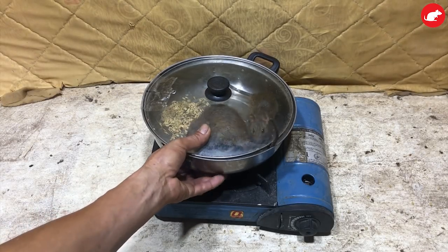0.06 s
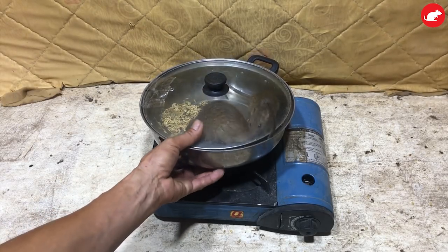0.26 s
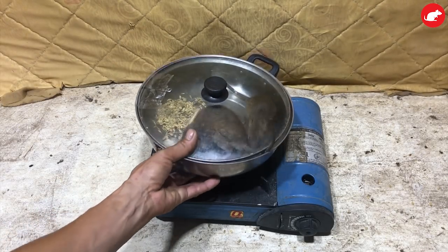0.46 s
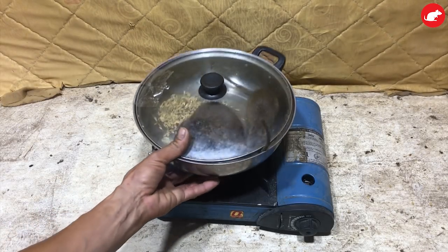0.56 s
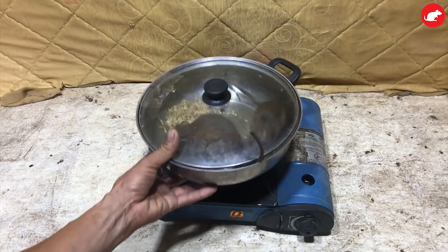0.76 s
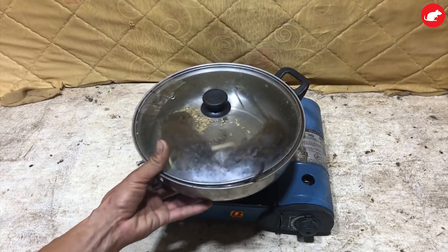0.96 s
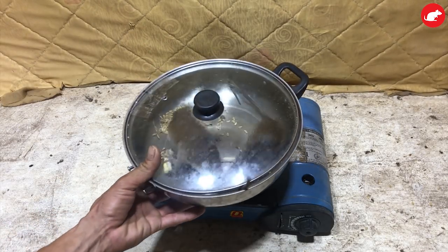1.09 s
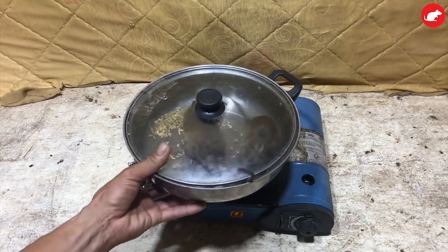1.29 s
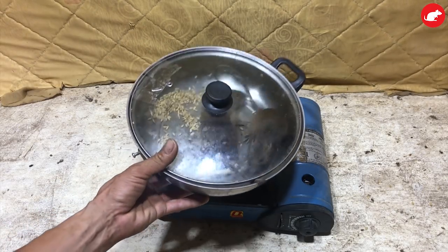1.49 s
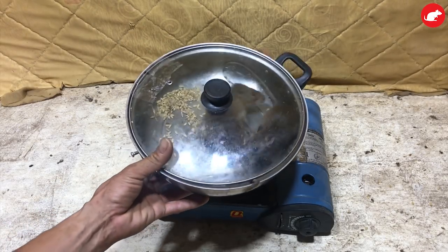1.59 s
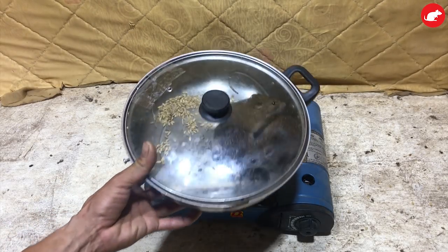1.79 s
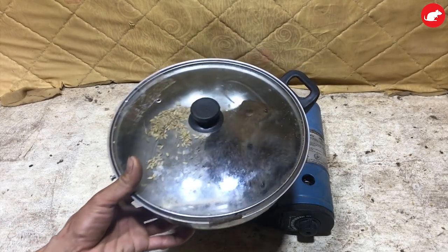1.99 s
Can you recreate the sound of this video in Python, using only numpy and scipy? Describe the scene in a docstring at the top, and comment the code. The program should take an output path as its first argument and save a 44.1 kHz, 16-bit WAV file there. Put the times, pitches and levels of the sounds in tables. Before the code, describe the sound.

A lidded steel pan is handled close by in a small, quiet room. At 0.2 seconds it thuds on a stove grate, then scrapes briefly as the lid clinks until about 0.5. A ringing clang comes at 0.8. From 1 to 1.9 seconds dry grains slide over the steel inside, with lighter knocks, lid clicks and a few tiny rim squeaks. A faint low hum lies underneath.

```python
"""A lidded steel pan is pulled off a portable gas stove and tilted by hand, close to one microphone.
It knocks on the grate, so that its hollow body thuds and its wall clangs; its base scrapes along
and the stove rocks on the table. The lid clicks in its rim, dry grains slide over the steel, and
the rim squeaks as it sticks and slips. The room is small and quiet, with a faint mains hum."""
import sys
import numpy as np
from scipy import signal
from scipy.fft import rfft, irfft
from scipy.io import wavfile

SR = 44100
rng = np.random.default_rng(int(sys.argv[2]) if len(sys.argv) > 2 else 0)


def transcribe(u):
    """Save the signal u as a 16-bit wav file named by the first command-line argument.

    u: samples, shape (n,) or (channels, n), limited to [-1, 1]; the rate is SR.
    q: integer samples, one column per channel.
    """
    v = np.clip(np.atleast_2d(u).T, -1, 1)
    q = np.round(v * 32767).astype(np.int16)
    wavfile.write(sys.argv[1], SR, q)


N = 90404
T = np.arange(N) / SR
HZ = np.maximum(np.fft.rfftfreq(N, 1 / SR), 1)

# the pan bumps the grate or its lid:
# start_s, thud_db, thud_tilt_db_per_octave, ring_length_factor, clang_db, wall_ring_db
KNOCKS = [(0.2016, -23.5, 4, 0.63, -34, -40), (.255, -29.5, -1.5, 1.08, -42, -56),
          (.313, -61, -2, 0.6, -37.5, -40), (.326, -37, -5, 0.94, -70, -70),
          (.479, -33, 3.5, 1.26, -38.5, -54), (0.526, -36.5, 2, 1.07, -48.5, -73),
          (.733, -53, -1, 1.1, -54, -40.5), (0.8349, -24.5, 1.5, 0.85, -32, -23),
          (.969, -42.5, -1, 2, -50, -44), (1.099, -42.5, 6, 0.99, -56, -41.5),
          (1.158, -44.5, -10.5, 1.3, -66, -44), (1.292, -32, -3, 1.04, -46, -50),
          (1.417, -43, 9, 0.95, -52.5, -48), (1.453, -48, -2, 1, -52.5, -51),
          (1.545, -47, 4, 1.2, -55, -48), (1.594, -60.5, 8, 0.87, -50.5, -46),
          (1.958, -49.5, 3, 1, -66, -48.5)]
THUD_RISE_S, CLANG_RISE_S, RING_RISE_S = 0.012, 0.0016, 0.0023
TILT_FROM_HZ, CUTOFF_HZ = 700, 15750


def thuds():
    """Knocks swell into the hollow pan's low modes; soft ones favour the lowest, a grip shortens them."""
    # the hollow body's modes: pitch_hz, level_db, t60_s
    body_modes = [(162, -14.5, 0.17), (200.1, -15.5, 0.34), (273.3, -4.5, 0.12), (295.2, -0.5, .08),
                  (303.6, -14, 0.31), (346, -8, 0.12), (418, -18.5, 0.24), (464, -19, 0.14)]
    out = 0
    for start, thud_db, tilt_db, ring_length, _, _ in KNOCKS:
        for hz, mode_db, t60 in body_modes:
            gain = from_db(thud_db + mode_db + tilt_db * np.log2(hz / 300))  # tilt pivots at 300 Hz
            out += gain * mode(start, hz, THUD_RISE_S, t60 * ring_length)
    return out


def clangs():
    """Each knock also rings the wall: a few clear modes among many crowded ones, damped by the hand."""
    # spectrum of the crowded modes: frequency_hz, level_db
    clang_spectrum = [(100, -27), (300, -10), (540, 1), (750, 1), (1000, 4), (1400, -0.5), (2000, -4.5),
                      (2700, -7.5), (3400, -13), (4000, -17), (8000, -16), (16000, -29)]
    # the wall's clear modes: pitch_hz, level_db, t60_s
    wall_modes = [(710, -14, 0.18), (764, -5.5, 0.066), (856, -7.5, 0.1), (964, -6, 0.1),
                  (1057, -16, 0.061), (1310, -17.5, 0.17), (1410, -27, 0.064), (1616, -18, 0.088),
                  (2150, -21, 0.037), (2810, -9, 0.027), (2970, -20, 0.13), (3340, -20, 0.059),
                  (3400, -17, .08)]
    power = sum((from_db(clang_db) * with_tail(start, CLANG_RISE_S, t60=0.082)) ** 2
                for start, *_, clang_db, _ in KNOCKS)
    crowded = colour(noise(), clang_spectrum, wall_share=0.89) * np.sqrt(power)
    clear = struck([(start, ring_db) for start, *_, ring_db in KNOCKS], wall_modes)
    return crowded + clear


def clicks():
    """Steel touches steel: a bright crack, a short ring of the wall and a long faint ring of the lid."""
    # sharp metal contacts: start_s, level_db, tilt_db_per_octave, ring_against_crack_db
    contacts = [(0.1996, -36.5, -1, -1.5), (0.2211, -37, -1, -2.5), (.2892, -44, -2, -25),
                (0.3055, -36, 0, -10.5), (0.3403, -32, 3, -17), (0.403, -24, -0.5, -7.5),
                (0.4209, -31, -1.5, -5), (0.447, -35.5, 1, -11.5), (0.477, -44, -5.5, -8),
                (0.5913, -47.5, 5.5, -20), (0.683, -54.5, -2.5, 3.5), (0.709, -45.5, -3, -3.5),
                (0.7323, -34, -2, -5), (0.833, -38, -5, 3.5), (0.8958, -43.5, -4, -11.5),
                (0.9661, -41, -4, -13.5), (1.0054, -48, 8, -0.5), (1.0966, -39, 4, -6),
                (1.1582, -33.5, 0, -16), (1.295, -34.5, -4, -6), (1.3212, -36, -1, -3.5),
                (1.3566, -39.5, -0.5, -5), (1.423, -37, -5, -21), (1.5344, -32.5, 1, -11),
                (1.557, -40, 3, -3.5), (1.571, -33, 3, -11), (1.598, -37, 4, 1), (1.634, -46.5, 6, -3),
                (1.8542, -36.5, -2, -8.5), (1.9372, -48.5, -2, -1.5)]
    # spectrum of the crack: frequency_hz, level_db
    crack_spectrum = [(80, -106), (300, 6.5), (900, -13), (2500, -1), (4500, 1.5), (6500, 6), (10000, 3.5),
                      (15500, 4)]
    # spectrum of the wall's short ring: frequency_hz, level_db
    ring_spectrum = [(80, -16), (300, 3.5), (900, -17), (2000, 0), (3000, -1), (4800, -5), (7000, 1),
                     (10000, -3.5), (15500, -6)]
    # the lid's modes: pitch_hz, level_db, t60_s
    lid_modes = [(1290, -28, 0.47), (1910, -25, 0.19), (2120, -43, 0.28), (2392, -22, 0.28),
                 (2670, -21.5, 0.15), (3586, -28, 0.1), (3810, -26, 0.12), (6610, -43, 0.22)]
    size = 16384  # samples per click
    crack_noise = colour(noise(), crack_spectrum, wall_share=1.0)
    ring_noise = colour(noise(), ring_spectrum, wall_share=1.76)
    snap = blow(0, rise=0.00091, t60=0.022)[:size]
    fade = with_tail(0, RING_RISE_S, t60=0.11)[:size]
    out = struck([(start, db) for start, db, _, _ in contacts], lid_modes)
    for start, db, tilt_db, ring_db in contacts:
        offset = rng.integers(N - size)
        crack = tilted(crack_noise[offset:offset + size], tilt_db) * snap
        ring = tilted(ring_noise[offset:offset + size], tilt_db) * fade
        out += from_db(db) * placed(start, crack + from_db(ring_db) * ring)
    return out


def scrape():
    """The base drags on the grate and the hand shifts on the rim, catching in many small slips."""
    # strength of the drag: time_s, level_db
    drag = [(0, -56), (.04, -59.5), (.08, -66), (.19, -65), (.225, -38.5), (.295, -57.5), (.325, -40),
            (.395, -45), (.44, -44.5), (.5, -58), (.58, -55.5), (.66, -62.5), (.8, -66), (1.2, -59.5),
            (1.27, -44.5), (1.36, -65.5), (1.8, -54), (1.93, -119), (2.01, -46), (2.05, -59)]
    # spectrum of the dragged steel: frequency_hz, level_db
    scrape_spectrum = [(40, -23), (110, -13.5), (170, 10), (230, -7), (320, 14.5), (480, -7.5), (620, 3.5),
                       (800, -1), (1300, 3), (2000, -2), (3500, -5), (5000, -8.5), (9000, -22.5),
                       (16000, -13)]
    slips = in_room(impacts(per_s=2500, spread_db=4.5), wet_db=-4)
    return colour(slips, scrape_spectrum, wall_share=0.46) * from_db(np.interp(T, *np.transpose(drag)))


def grains():
    """Dry grains tumble in clumps over the steel."""
    # flow of the sliding grains: time_s, level_db
    flow = [(0, -68.5), (.55, -69), (.64, -68), (.82, -63), (.94, -61.5), (1.0, -55.5), (1.06, -51.5),
            (1.09, -55), (1.14, -43), (1.19, -46.5), (1.26, -43.5), (1.4, -46), (1.5, -45.5), (1.6, -45.5),
            (1.655, -51), (1.73, -43), (1.8, -48), (1.87, -51.5), (1.925, -59.5), (1.97, -54.5),
            (2.05, -54.5)]
    # spectrum of grains on steel: frequency_hz, level_db
    grain_spectrum = [(80, -31), (250, -4), (600, -1.5), (1000, -1.5), (1700, -6.5), (2900, 3.5), (4500, 2),
                      (6500, 4), (8500, 1), (11000, -3.5), (15500, -0.5)]
    hits = impacts(per_s=5000, spread_db=3)
    clumps = from_db(2.15 * drift(rate_hz=33))
    patter = in_room(hits * clumps, wet_db=2.5)
    return colour(patter, grain_spectrum, wall_share=0.97) * from_db(np.interp(T, *np.transpose(flow)))


def squeaks():
    """The rim sticks and slips in brief chirps that sag in pitch, each with its octave."""
    # slips of the rim: start_s, length_s, pitch_hz, level_db, roughness_0_to_1
    rim_slips = [(1.143, 0.0071, 3160, -32, 0.69), (1.472, 0.0076, 5810, -33, 0.6),
                 (1.488, 0.012, 2920, -43, 1.0), (1.587, 0.0105, 6600, -30.5, .1),
                 (1.591, 0.01, 5190, -36, 0.25), (1.599, 0.023, 4540, -38, 0.7),
                 (1.674, 0.0039, 9730, -41, .6), (1.679, 0.016, 7760, -36.5, 0.5),
                 (1.77, 0.021, 3170, -38.5, 0.95)]
    sag_per_s, octave_db = 2.5, -9.5
    out = 0
    for start, length, hz, db, roughness in rim_slips:
        t = np.clip(T - start, 0, length)
        jitter = 0.16 * roughness * drift(rate_hz=835)
        pitch = hz * (1 - sag_per_s * (t - length / 2) + jitter)
        phase = 2 * np.pi * np.cumsum(pitch) / SR
        arch = np.sqrt(np.abs(np.sin(np.pi * t / length)))
        out += from_db(db) * arch * (np.sin(phase) + from_db(octave_db) * np.sin(2 * phase))
    return in_room(out, wet_db=-5)


def stove():
    """The stove's feet bump dully on the table as the weight comes off."""
    # bumps of the feet: start_s, level_db
    rocks = [(0.206, -41.5), (0.235, -39.5)]
    return sum(from_db(db) * mode(start, hz=85, rise=THUD_RISE_S, t60=0.13) for start, db in rocks)


def room_tone():
    """The quiet room: a low rumble and a slightly wavering mains hum."""
    # spectrum of the room tone: frequency_hz, level_db
    room_spectrum = [(15, -53), (30, -65), (44, 12.5), (55, 2), (75, -1.5), (115, -8.5), (170, -1.5),
                     (300, 0.5), (500, -12.5), (1000, -19), (3000, -25), (8000, -44), (16000, -26)]
    # mains hum: pitch_hz, level_db
    hum_tones = [(49, -65)]
    rumble = from_db(-59) * colour(noise(), room_spectrum)
    hum = sum(from_db(db) * np.sin(2 * np.pi * hz * T + 0.95 * drift(rate_hz=6)) for hz, db in hum_tones)
    return rumble + hum


def in_room(x, wet_db):
    """Add the dense echoes from under the lid and the room's near walls."""
    echoes = noise() * blow(0, RING_RISE_S, t60=0.15)
    return x + from_db(wet_db) * signal.fftconvolve(x, echoes / np.linalg.norm(echoes))[:N]


def with_tail(start, rise, t60):
    """A blow's envelope with the room's late tail."""
    tail = from_db(-23) * blow(start, rise, t60=0.77)
    return np.hypot(blow(start, rise, t60), tail)


def blow(start, rise, t60):
    """Envelope that swells, then falls 60 dB in t60 seconds; peak 1."""
    t = np.maximum(T - start, 0)
    shape = (1 - np.exp(-(t / rise) ** 2)) * from_db(-60 * t / t60)
    return shape / (shape.max() + 1e-12)


def mode(start, hz, rise, t60):
    """One struck mode: a sine that swells and dies away."""
    t = T[:int(min(t60 * 1.5, 1) * SR) + 500]
    shape = (1 - np.exp(-(t / rise) ** 2)) * from_db(-60 * t / t60)
    return placed(start, shape / shape.max() * np.sin(2 * np.pi * hz * t))


def struck(hits, modes):
    """Ring a table of modes with hits of (start_s, level_db)."""
    response = sum(from_db(db) * mode(0, hz, CLANG_RISE_S, t60) for hz, db, t60 in modes)
    return sum(from_db(db) * placed(start, response) for start, db in hits)


def impacts(per_s, spread_db):
    """Random tiny impacts, a few much stronger than the rest."""
    sizes = from_db(spread_db * np.minimum(rng.exponential(1, N), 4)) * rng.choice([-1, 1], N)
    return sizes * (rng.random(N) < per_s / SR)


def colour(x, spectrum, wall_share=0):
    """Give x a spectrum and a share of the steel's resonances; rms 1."""
    # resonances of the steel wall and lid: centre_hz, width_hz, lift_db
    resonances = [(715, 60, 7), (935, 70, 10), (1335, 70, 7), (1647, 70, 4), (2550, 120, 3), (2860, 130, 5),
                  (3150, 110, 4), (3390, 100, 4), (3930, 100, 3), (5090, 80, 3), (5780, 140, 3),
                  (6260, 130, 4), (6640, 140, 6)]
    hz, db = np.transpose(spectrum)
    peaks_db = sum(lift / (1 + (2 * (HZ - centre) / width) ** 2) for centre, width, lift in resonances)
    gain = from_db(np.interp(np.log(HZ), np.log(hz), db) + wall_share * peaks_db)
    # minimum phase, so the ringing follows each impact
    cepstrum = irfft(np.log(gain), N)
    causal_half = (T > 0) & (T < T[-1] / 2)
    response = np.exp(rfft(2 * cepstrum * causal_half))
    return rms_one(irfft(rfft(x) * response, N))


def tilted(x, tilt_db):
    """Brighten or dull by tilt_db per octave; rms 1."""
    hz = np.clip(np.fft.rfftfreq(len(x), 1 / SR), TILT_FROM_HZ, CUTOFF_HZ)
    return rms_one(irfft(rfft(x) * from_db(tilt_db * np.log2(hz)), len(x)))


def placed(start, x):
    """A short sound set at its time in the scene."""
    return np.pad(x, (int(start * SR), N))[:N]


def drift(rate_hz):
    """Random wander, mostly slower than rate_hz; rms 1."""
    return rms_one(irfft(rfft(noise()) / (1 + (HZ / rate_hz) ** 2), N))


def noise():
    """White noise."""
    return rng.standard_normal(N)


def rms_one(x):
    """Scale to rms 1."""
    return x / np.sqrt(np.mean(x ** 2) + 1e-20)


def from_db(db):
    """Decibels to gain."""
    return 10 ** (np.asarray(db) / 20)


def scene():
    """Pan, grains and stove over the room tone, in mono."""
    return (room_tone() + thuds() + clangs() + clicks() + grains() + scrape() + squeaks() + stove())[None]


def record(dry):
    """The microphone's signal, cut steeply in the top treble."""
    lowpass = signal.ellip(12, 0.1, 80, CUTOFF_HZ, fs=SR, output="sos")
    return signal.sosfilt(lowpass, dry)


dry = scene()
out = record(dry)
transcribe(out)
```